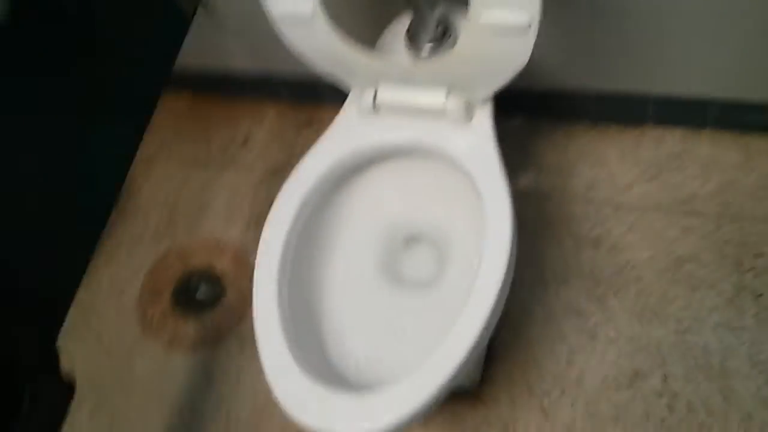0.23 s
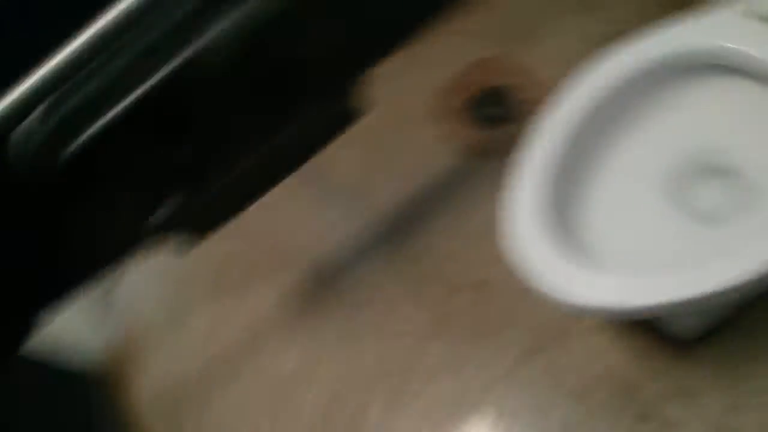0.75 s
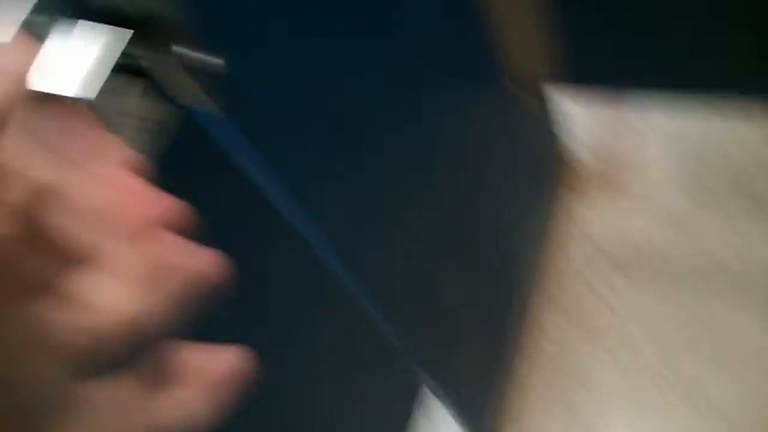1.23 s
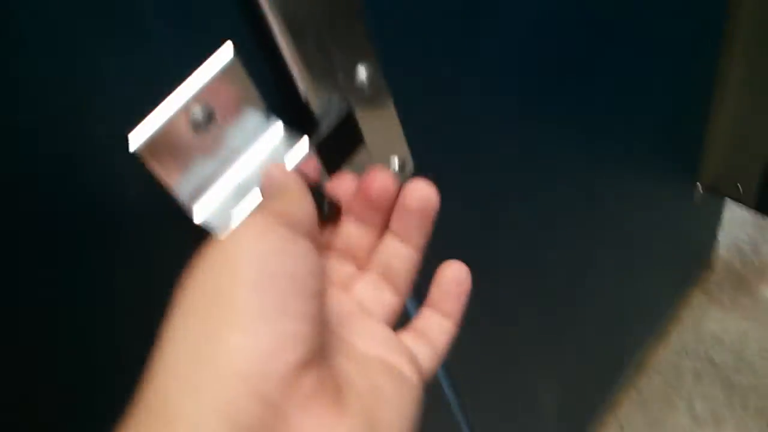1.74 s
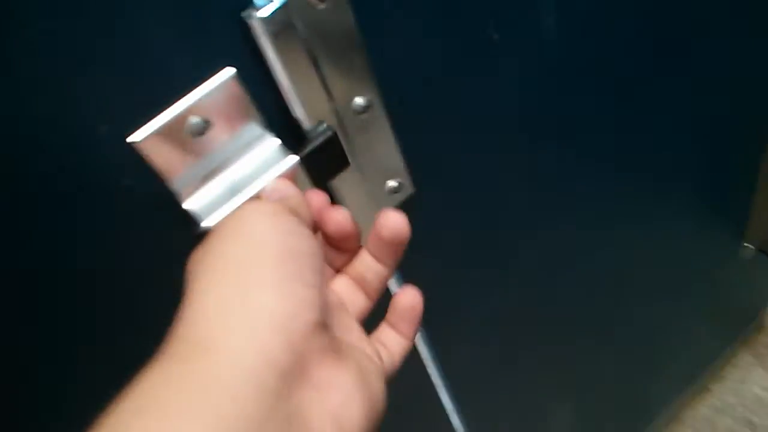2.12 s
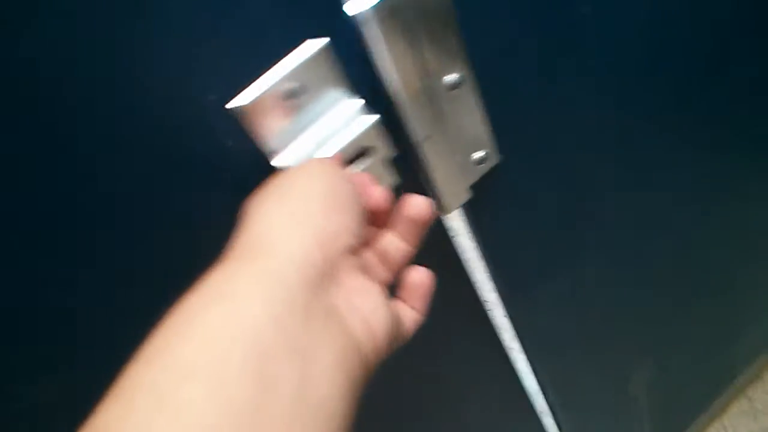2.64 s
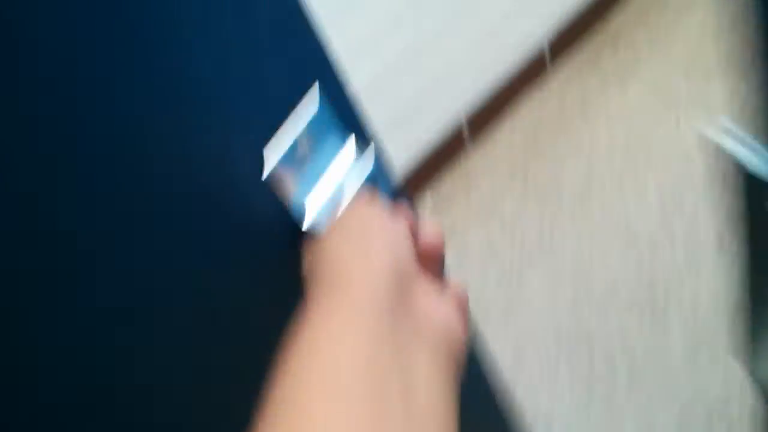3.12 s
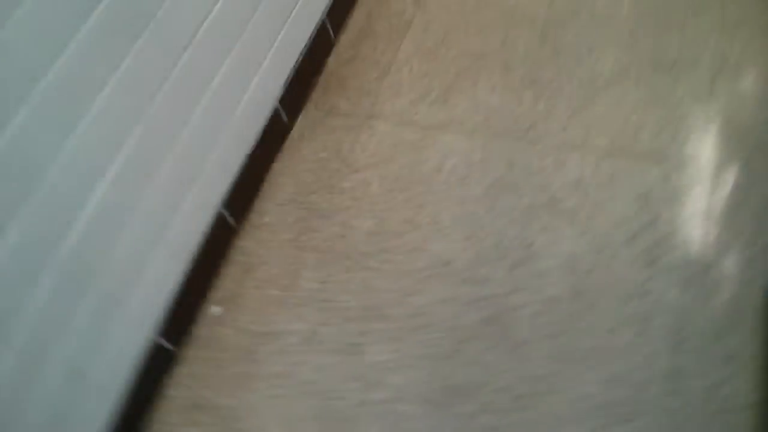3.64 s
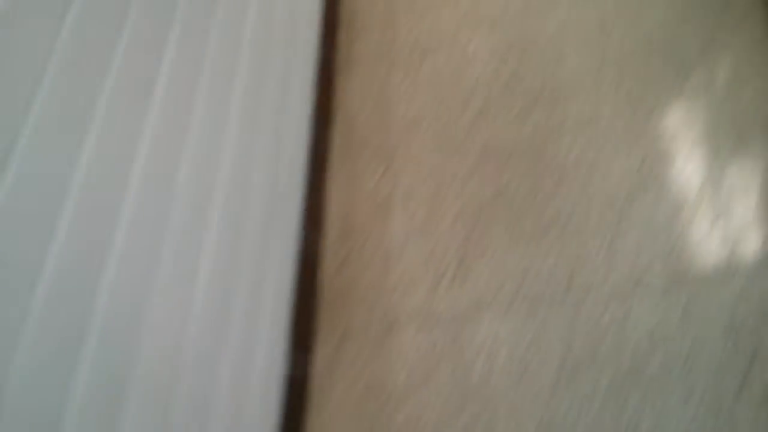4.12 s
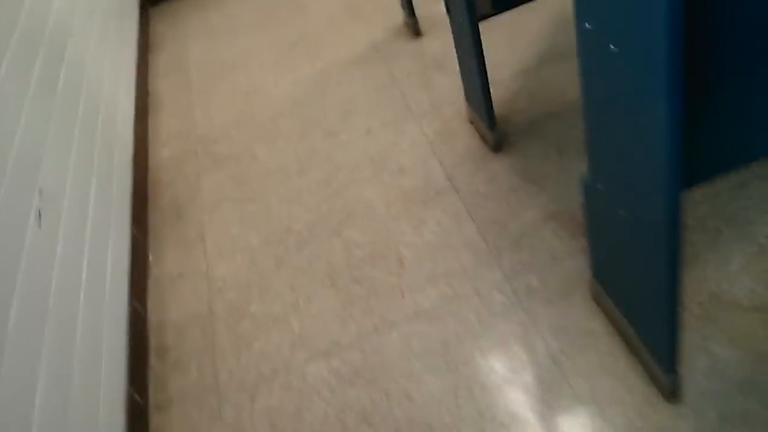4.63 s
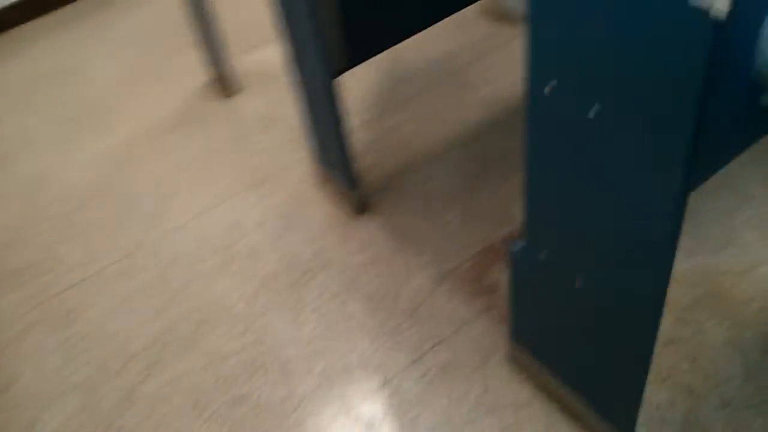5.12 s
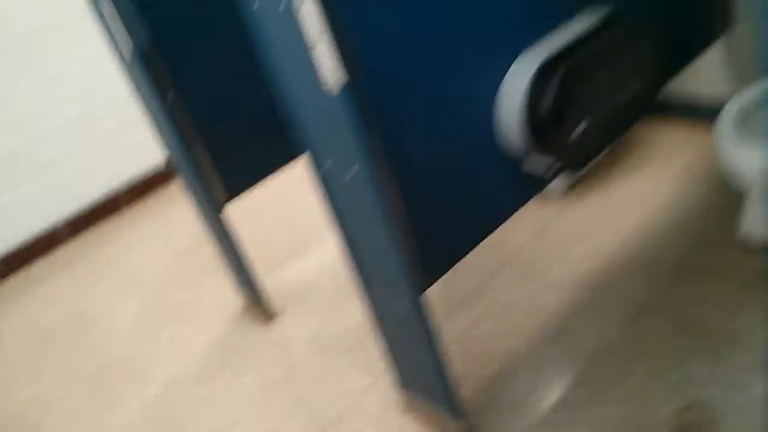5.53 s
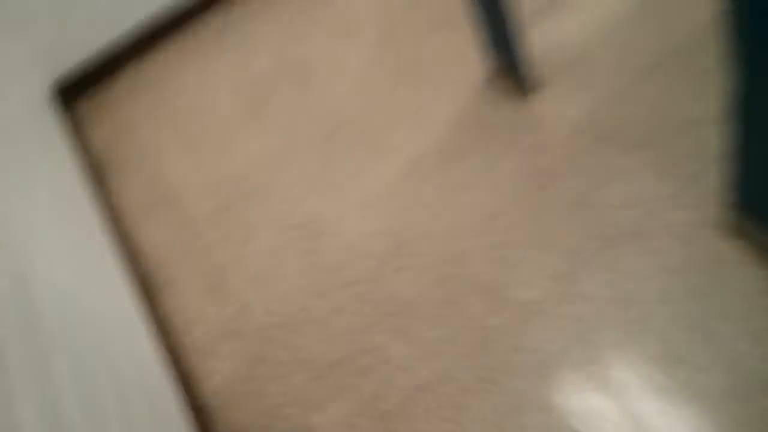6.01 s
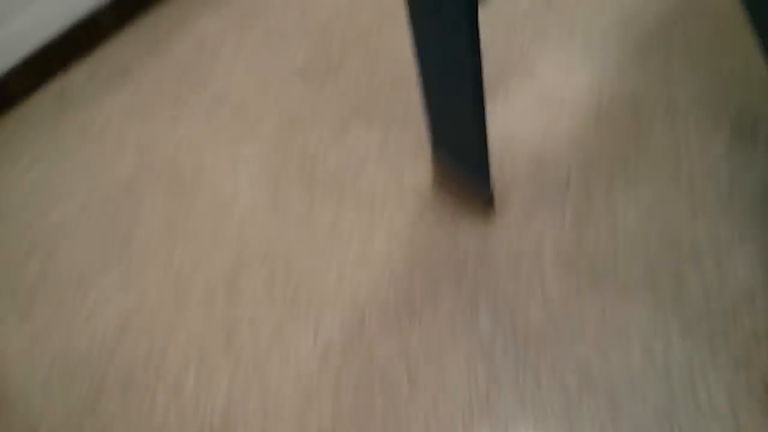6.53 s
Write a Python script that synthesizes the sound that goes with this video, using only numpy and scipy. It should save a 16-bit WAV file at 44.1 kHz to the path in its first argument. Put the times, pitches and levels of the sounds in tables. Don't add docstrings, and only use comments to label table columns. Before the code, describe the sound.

Low electrical hum swells and fades in a tiled restroom while a stall bolt slams, its latch rattles, and soft steps, taps and cloth follow.

```python
import sys
import numpy as np
from scipy import signal
from scipy.fft import rfft, irfft, next_fast_len
from scipy.io import wavfile
from scipy.ndimage import uniform_filter1d, map_coordinates

SR = 44100
rng = np.random.default_rng(int(sys.argv[2]) if len(sys.argv) > 2 else 0)


def natural_amplitude(level_db):
    exponent = np.asarray(level_db, float) / 20
    return 10 ** exponent


def wrap_up_sound(samples):
    columns = np.atleast_2d(samples).T
    tamed = np.clip(columns, -1, 1)
    steps = np.round(tamed * 32767).astype(np.int16)
    wavfile.write(sys.argv[1], SR, steps)


N = 298107

MAINS_HZ = 60


def hum():
    beat_hz, shaft_hz, shaft_db = 19, 58.8, -62.5
    # (multiple of mains [1], motor beats added [1], level [dB])
    hum_lines = [(2, -1, -72.5), (2, 0, -58.5), (2, 0.95, -62), (3, 0, -63.5), (4, -1, -63), (4, 0, -62),
                 (4, 1, -69.5), (6, -1, -64), (6, 0, -65), (6, 0.96, -70.5), (8, -1.2, -68), (8, 0, -65.5),
                 (10, -0.56, -72), (10, 0.28, -72.5)]
    total = np.zeros(N)
    for multiple, beats, db in hum_lines:
        hz = multiple * MAINS_HZ + beats * beat_hz
        total += standing(hz) * line(hz, db, flutter_db=1.82)
    t = np.arange(N) / SR
    share, fades_s, slower_hz, in_step_s = 0.65, 4.1, 2.4, 0.066
    twin = share / (1 + np.exp((t - fades_s) / 0.17))
    beating = np.abs(1 + twin * np.exp(2j * np.pi * slower_hz * (t - in_step_s)))
    return total + beating * standing(shaft_hz) * line(shaft_hz, shaft_db, flutter_db=1.0)


def line(hz, db, flutter_db):
    phase = 2 * np.pi * (hz * np.arange(N) / SR + rng.random())
    phase = phase + 0.2 * flutter_db * wobble(5)
    return np.sqrt(2) * natural_amplitude(db + flutter_db * wobble(9)) * np.sin(phase)


def standing(hz):
    # (time [s], half length [s], room resonance
    # [Hz], gain [dB])
    loud_spots = [(0.15, 0.22, 152.5, 24), (0.187, 0.21, 246, 27), (0.207, 0.12, 355.5, 17.5),
                  (0.397, 0.45, 490, 10), (0.59, 0.478, 350, 8.5), (0.764, 0.27, 243.7, 21),
                  (0.987, 0.098, 244, 15.5), (1.093, 0.46, 148, 19), (1.123, 0.18, 241, 25),
                  (1.29, 0.11, 241, 10), (1.378, 0.3, 112, 22.5), (1.496, 0.13, 234, 5.5),
                  (1.57, 1.5, 56.1, 8.5), (1.663, 0.12, 355, 5.5), (2.189, 0.61, 120.6, 25.5),
                  (2.26, 0.1, 497, 17), (2.28, 0.37, 329.5, 3.5), (3.1, 0.57, 122.8, 14.5),
                  (3.14, 0.21, 350.6, 18), (3.254, 0.38, 476.3, 8), (3.594, 0.53, 249.6, 0),
                  (4.15, 0.596, 356.6, 13.4), (4.21, 0.166, 480, 9.4), (4.22, 0.034, 160.4, 27),
                   (4.27, 0.64, 182.3, 13), (4.29, 0.069, 56.4, 11.3), (4.43, 0.34, 268.2, 26.6),
                   (4.56, 0.24, 224.7, 19.5), (4.86, 0.11, 474, 20), (4.978, 0.22, 136, 4.9),
                   (4.98, 0.2, 60.8, 13), (5.02, 0.28, 243.5, 19.2), (5.59, 0.12, 59, 13.7),
                   (5.72, 0.31, 366.2, 13.7), (5.77, 0.21, 241, 16.2), (6.07, 0.094, 137, 13),
                   (6.14, 0.183, 60, 14), (6.16, 0.092, 270, 22), (6.18, 0.11, 364, 25.3),
                   (6.2, 0.11, 470, 15), (6.38, 0.81, 168.3, 16.6), (6.49, 0.15, 364, 18),
                   (6.54, 0.2, 243.7, 16.6), (6.56, 0.19, 488, 16.4), (6.6, 0.092, 134, 6.2),
                   (6.65, 0.084, 218.7, 16)]
    # (time [s], half length [s], centre [Hz], share cancelled [0-1])
    dead_spots = [(.5, 0.4, 114, 0.9), (1.3, 0.46, 488, .7), (3.738, 0.37, 57.7, 1),
                  (4.081, .05, 183.3, 0.9), (4.479, .13, 125, 0.84), (5.4, 0.13, 238, 1),
                  (5.454, 0.14, 477, 0.85), (4.55, 0.23, 211.7, 0.36)]
    spot_width_hz = 16
    t = np.arange(0, N + 256, 256) / SR

    def near(s, half, spot_hz):
        return np.exp(-((hz - spot_hz) / spot_width_hz) ** 2 - ((t - s) / half) ** 2)

    loud = 1 + sum(natural_amplitude(db) * near(*spot) for *spot, db in loud_spots)
    dead = np.prod([1 - min(share, 1) * near(*spot) for *spot, share in dead_spots], axis=0)
    return np.interp(np.arange(N) / SR, t, loud * dead)


def slam():
    # (time [s], peak [dB], middle [dB], treble [dB], time to fall 60 dB [s])
    blows = [
        (1.826, -56, -15.5, -30.5, 0.029),
        (1.84, -37.5, -13, -29.5, 0.25),
        (1.8546, 1, -2, 16, 0.008),
        (1.8554, 0, -2, 13.5, 0.0085),
        (1.8574, -1.5, -4.5, 1.5, 0.045),
        (1.864, -3, 0, 0.5, .012),
        (1.873, -12.5, 0, -2, 0.025),
        (1.882, -15, 0, -1.5, 0.019),
    ]
    # (frequency [Hz], level [dB per Hz])
    colour = [(240, -45), (400, -23), (1010, -25), (1540, -3), (1690, -11.5), (1860, -1.5), (2460, -5.5),
              (4500, -5.5), (5330, -12.5), (7390, -4.5), (9200, -6.5), (11700, -15.5), (12500, -22),
              (14000, -24), (14900, -17), (15600, -30), (16500, -40)]
    # (frequency [Hz], width [Hz], level [dB])
    plate = [(1600, 47, 3), (1905, 33, 2), (2360, 31, 5.5), (2800, 46, 5.5), (3110, 51, 10.5),
             (3650, 63, 2.5), (4560, 110, 4.5), (6070, 88, 3), (6440, 130, 3), (7220, 38, 7.5),
             (7570, 65, 5), (8060, 61, 8.5), (8400, 30, 7.5), (8600, 55, 7.5)]
    room_db = -3.5
    return contacts([(*blow, room_db) for blow in blows], colour, plate, chatter=0.7)


def rattle():
    # (time [s], peak [dB], middle [dB], treble [dB], time to fall 60 dB [s])
    bounces = [
        (2.1972, -18.5, 13, 29.5, 0.018),
        (2.201, -23, 8.5, 9.5, 0.036),
        (2.2241, -15.5, 4.5, -3, 0.008),
        (2.2295, -21.5, 1, -2.5, .02),
        (2.2868, -10.5, 3.5, 12, 0.01),
        (2.2882, -12, 0, 6.5, .015),
        (2.295, -21, 9.5, 11, .01),
        (2.304, -17, 2.5, 1, .01),
        (2.309, -19.5, 0, -0.5, .01),
        (2.316, -19, 5, 1, .01),
    ]
    # (frequency [Hz], level [dB per Hz])
    colour = [(450, -47), (750, -24), (1000, -23.5), (1260, -3), (1700, -6.5), (1900, 1.5), (2320, 0),
              (2600, -8.5), (3100, -22), (3800, -31.5), (4400, -19), (5000, -19.5), (5600, -31.5),
              (10500, -55.5), (15000, -78.5)]
    # (frequency [Hz], width [Hz], level [dB])
    latch = [(1220, 60, -1), (1332, 68, 9), (1500.4, 40.3, 2.5), (1633, 40, 3), (1910, 34, 7.5),
             (2093, 40, 7.5), (2160, 400, 2.5), (2306, 45, 9), (2720, 32.3, 4.5), (3000, 100, 5),
             (4260, 100, 4.5), (4690, 70, 8.5), (4960, 30, 11)]
    rows = [(*bounce, -5) for bounce in bounces]
    return contacts(rows, colour, latch, chatter=0.45, click=0.6, swell_s=0.001)


def knock():
    # (time [s], peak [dB], middle [dB], treble [dB], time to fall 60 dB [s])
    bumps = [
        (4.267, -35, -2, 0.0059, 0.02),
        (4.2703, -27, 6.5, 0, 0.017),
        (4.2765, -27.5, 4.5, 0, .015),
        (4.2847, -27, -14, 0, 0.025),
        (4.2921, -30, -17, 0, .015),
        (4.364, -45, -3, 0, .01),
    ]
    # (frequency [Hz], level [dB per Hz])
    colour = [(500, -43), (950, -25.5), (1200, -9.5), (1600, -0.5), (2000, -3), (2200, -15), (3200, -9.5),
              (3900, -24.5), (4900, -20.5), (5400, -44), (7000, -57)]
    # (frequency [Hz], width [Hz], level [dB])
    door = [(1615, 62, -9), (1910, 29, -4), (2270, 70, -15), (2710, 110, -8), (3070, 49, -9),
            (3920, 29, -20), (4300, 45, -21), (4640, 81, -26)]
    rings_db, room_db = 2.5, 0.5
    panel = [(hz, width, rings_db + db / 4) for hz, width, db in door]
    return contacts([(*bump, room_db) for bump in bumps], colour, panel, chatter=0.5)


def taps():
    # (time [s], peak [dB], middle [dB], treble [dB], room [dB])
    touches = [(0.0351, -37, -14, -14, 1.5), (0.0454, -18, -32, -26.5, -17.5), (0.0556, -35, -11, -6, -0.5),
               (0.182, -32, -28, -3, -9.5), (0.6205, -35, -22, -15, 1), (0.843, -46.5, -36, -42, -6),
               (0.8932, -45, -33, -18, -13), (0.909, -41, -31, -25, -4), (0.9894, -47.5, -37, -23, -18),
               (4.7444, -50.5, -28, -30, -1.5), (4.857, -53, -27, -28, -8), (4.8889, -23, -23, -26, -8.5),
               (5.082, -46, -28, -26, -10), (5.542, -49, -9.5, -20.5, 6.5), (5.9877, -52, -9, -26, 8.5),
               (6.0461, -19, -17.5, -18, -8.5), (6.0685, -42, -8, 3, -13.5), (6.114, -42, -25, -25, -6),
               (6.5555, -47, -37, -16, 4.5), (6.7554, -19.5, -1.5, -8, -10)]
    # (frequency [Hz], level [dB per Hz])
    colour = [(300, -12), (700, -19.5), (1000, -7), (1400, 0.5), (2200, -6.5), (2600, -28.5), (3050, -10),
              (3600, -5), (4500, 0.5), (5600, 3.5), (6600, 6), (9500, -6.5), (16000, -21.5)]
    t60_s, delay_s = 0.0098, 0.001
    rows = [(*touch, t60_s, room_db) for *touch, room_db in touches]
    return contacts(rows, colour, [], chatter=0.15, lag=delay_s)


def contacts(rows, colour, modes, chatter, lag=0, click=1, swell_s=1e-5):
    out, t = np.zeros(N + SR), np.arange(4096) / SR
    last = -1

    def ring(f):
        return 1 + sum(natural_amplitude(g) * 1j * f * w / (c * c - f * f + 1j * f * w) for c, w, g in modes)

    def shaded(f):
        return 0.43 + 0.55 * ring(f)

    for s, db, mid_db, high_db, t60, room_db in rows:
        rise = 1 - np.exp(-t / max(swell_s, 1e-5))
        grit = chatter * rng.standard_normal(len(t)) * natural_amplitude(-60 * t / max(t60, 0.002)) * rise
        crack = grit + click * (t == 0)
        tilt = [(2500, 0), (3300, mid_db), (5300, mid_db), (6000, high_db)]
        push = causal(lambda f: along(colour, f) + along(tilt, f), len(t))
        hit = filtered(signal.fftconvolve(crack, push), ring)
        hit = hit * natural_amplitude(db) / np.abs(hit).max()
        shade = filtered(push, shaded)
        shade = shade * np.linalg.norm(hit) / np.linalg.norm(shade)
        if s - last > 0.02:
            room, last = tail(), s
        wet = natural_amplitude(room_db) * signal.fftconvolve(shade, room)
        start = round((s + lag) * SR)
        out[start:start + len(hit)] += hit
        out[start:start + len(wet)] += wet
    return out[:N]


def tail():
    # (frequency [Hz], time to fall 60 dB [s])
    tiles = [(500, 0.23), (1300, 0.35), (2200, 0.22), (3200, 0.23), (5000, .3), (9000, 0.18), (11500, 0.18),
             (13000, 0.15)]
    patchy_db = 3
    late_db, late_longer = -23.5, 2.7
    hz, t, z = signal.stft(rng.standard_normal(SR // 2), SR, nperseg=256)
    fall_db = -60 * t / along(tiles, hz)[:, None]
    clumps = uniform_filter1d(rng.standard_normal(z.shape), size=9, axis=0)
    clumps = uniform_filter1d(clumps, size=3, axis=1)
    fall = natural_amplitude(fall_db) + natural_amplitude(late_db + fall_db / late_longer)
    x = signal.istft(z * natural_amplitude(patchy_db * unit(clumps)) * fall, SR, nperseg=256)[1]
    return np.pad(x / np.linalg.norm(x), (120, 0))


def thuds():
    # (time [s], peak [dB], pitch [Hz], time to fall 60 dB [s], dull puff [dB])
    steps = [(.298, -44, 564.3, 0.066, 4), (4.06, -47, 550, 0.059, -2), (4.108, -42, 557, 0.046, 3),
             (1.856, -32.5, 595, 0.063, -8), (3.399, -38, 72, 0.16, -23), (4.208, -36, 596, 0.086, -1),
             (4.36, -32, 349, 0.07, -5), (4.887, -27.5, 191.7, 0.055, 0.5), (6.05, -25, 114, 0.07, -13),
             (6.129, -27, 200, 0.1, -17), (6.56, -28.5, 456, 0.084, -8), (6.752, -28, 153, 0.22, -3)]
    out, t = np.zeros(N + SR), np.arange(SR // 3) / SR
    for s, db, hz, t60, puff_db in steps:
        noise = rng.standard_normal(len(t))
        puff = unit(filtered(noise, lambda f: f / (f + 80) / (1 + (f / 620) ** 8)))
        shape = natural_amplitude(-60 * t / t60) * (1 - np.exp(-t / 0.0042))
        push = np.sin(2 * np.pi * hz * t) + natural_amplitude(puff_db) * puff
        out[round(s * SR):][:len(t)] += natural_amplitude(db) * shape * push
    return out[:N]


def rubs():
    # (time [s], length [s], centre [Hz], width [Hz],
    # level [dB])
    strokes = [(0.189, 0.088, 2070, 252, -64), (0.367, 0.088, 2110, 252, -68.5),
               (.06, 0.23, 1600, 1300, -64), (0.401, 0.17, 1350, 420, -60), (0.611, 0.098, 1300, 354, -58),
               (0.886, 0.041, 1610, 960, -53.5), (4.742, 0.079, 510, 223, -50.5),
               (4.879, 0.017, 1600, 1200, -50), (4.95, 0.24, 610, 450.3, -58.5),
               (6.044, .01, 1500, 1200, -52), (4.901, 0.2, 1670, 1402, -66),
               (5.02, 0.058, 1490, 352, -62.5), (6.07, 0.2, 1580, 1460, -61),
               (6.477, 0.21, 1502, 1202, -65.5), (6.638, 0.083, 1396, 393, -58),
               (0.052, 0.0079, 6260, 699, -44), (0.382, 0.25, 7550, 4702, -63),
               (0.613, 0.031, 7300, 1102, -66), (1.8395, .002, 8400, 1800, -54),
               (1.847, 0.0046, 8900, 2200, -49), (1.678, 0.027, 9000, 6000, -64),
               (2.057, .006, 10300, 1510, -60), (2.1975, 0.0027, 8500, 1210, -32),
               (6.046, 0.0072, 6500, 1500, -46), (4.79, .055, 4750, 350, -64),
               (0.755, 0.041, 7000, 3000, -66), (4.894, 0.022, 7240, 5050, -50),
               (4.895, 0.18, 4180, 1502, -67.5), (5.526, 0.15, 4050, 1614, -65),
               (5.97, 0.083, 9840, 2460, -63.5), (6.063, 0.2, 6160, 6030, -61.5),
               (6.65, 0.076, 4330, 902, -69.5)]
    # (time [s], length [s], level [dB])
    swishes = [(1.225, 0.13, -68), (2.43, 0.082, -67.5), (2.935, 0.053, -70), (3.925, .1, -67),
               (4.631, .09, -67), (6.554, 0.11, -66.5)]
    swish_hz, swish_width_hz = 11200, 9300
    sleeves = [(s, length, swish_hz, swish_width_hz, db) for s, length, db in swishes]
    out = np.zeros(N + SR)
    for s, length, hz, width, db in strokes + sleeves:
        u = np.arange(SR // 4) / SR / length
        rough = uniform_filter1d(rng.standard_normal(len(u)), size=150) * np.sqrt(150)
        grit = rng.standard_normal(len(u)) * natural_amplitude(1.47 * rough)
        band = unit(filtered(grit, lambda f: 1 / (1 + ((f - hz) / (width / 2)) ** 4)))
        out[round(s * SR):][:len(u)] += natural_amplitude(db) * band * np.clip(5 * u, 0, 1) * np.exp(-u ** 2.4)
    return out[:N]


def cloth():
    # (time [s], cloth level [dB])
    moving = [(0, -63.5), (.3, -67), (1.24, -71), (2.8, -73.5), (4.1, -72), (4.75, -71.5), (5.1, -70),
              (5.95, -72), (6.3, -72), (6.76, -66.5)]
    # (frequency [Hz], level [dB per Hz])
    rustle_colour = [(500, -20.5), (900, 2.5), (1350, 1.5), (1750, -2.5), (2100, -2.5), (2600, -11),
                     (3100, -22.5), (4000, -42.5)]
    # (frequency [Hz], level [dB per Hz])
    scuff_colour = [(2600, -23.5), (3200, -7), (3800, -2), (4700, 1), (5500, -3), (6500, -23.5)]
    moving_db = curve(moving)
    usual_db = moving_db.mean()
    scuff_db = usual_db - 9.5 + 0.8 * (moving_db - usual_db)
    scuff_db = scuff_db + 0.83 * np.arange(N) / SR
    rustle = natural_amplitude(moving_db + 0.1) * rush(rustle_colour, patchy_db=2.5)
    return rustle + natural_amplitude(scuff_db) * rush(scuff_colour, patchy_db=1.0)


def water():
    # (frequency [Hz], level [dB per Hz])
    rumble_colour = [(60, -29), (120, -2.5), (200, -2), (300, -3.5), (500, -7), (650, -20.5), (850, -26.5),
                     (1500, -42)]
    # (frequency [Hz], level [dB per Hz])
    drone_colour = [(12, -13), (25, 1), (40, -6.5), (80, -4), (200, -6.5), (450, -17.5), (900, -31.5),
                    (1200, -47)]
    follows = 0.54
    swell = (standing(6 * MAINS_HZ) * standing(8 * MAINS_HZ)) ** (follows / 2)
    rumble = swell * natural_amplitude(-56.5 + 1.7 * wobble(6.4)) * rush(rumble_colour, patchy_db=3.0)
    drone = natural_amplitude(-56.5 + 1.7 * wobble(5.5)) * rush(drone_colour, patchy_db=1.5)
    return rumble + drone


def air():
    # (time [s], level [dB])
    vent = [(0, -68), (1.15, -70), (1.8, -68.5), (2.96, -72), (3.9, -69), (4.86, -68), (5.29, -71.5),
            (5.9, -73.5), (6.12, -69), (6.45, -71.5), (6.76, -66.5)]
    # (frequency [Hz], level [dB per Hz])
    hiss_colour = [(4000, -20), (5500, -6), (7000, -5), (9300, 1), (10800, -6.5), (12000, -18.5),
                   (14000, -39)]
    # (frequency [Hz], level [dB per Hz])
    thin_colour = [(9500, -27), (11500, -1.5), (12500, 1.5), (14000, -1), (15500, -4), (16300, -17)]
    vent_db = curve(vent)
    thin_db = vent_db - 12 + 1.22 * np.arange(N) / SR
    hiss = natural_amplitude(vent_db + 1.05) * rush(hiss_colour, patchy_db=2.5)
    return hiss + natural_amplitude(thin_db) * rush(thin_colour, patchy_db=-0.3)


def rush(spectrum, patchy_db):
    z = signal.stft(rng.standard_normal(N + 512), nperseg=512)[2]
    field = uniform_filter1d(rng.standard_normal(z.shape), size=8, axis=0)
    field = uniform_filter1d(field, size=8, axis=1)
    patches = natural_amplitude(patchy_db * np.clip(unit(field), -2, 2))
    x = signal.istft(z * patches, nperseg=512)[1][:N]
    points = [(4.5, -120)] + spectrum + [(SR / 2, -120)]
    return unit(filtered(x, lambda hz: natural_amplitude(along(points, hz))))


def unit(x):
    return x / np.sqrt(np.mean(x ** 2) + 1e-20)


def along(points, hz):
    f, v = np.transpose(points)
    return np.interp(np.log(hz + 1), np.log(f + 1), v)


def curve(points):
    s, v = np.transpose(points)
    return np.interp(np.arange(N) / SR, s, v)


def wobble(rate):
    t = np.arange(0, N + 128, 128) / SR
    knots = rng.standard_normal(int(N * rate / SR) + 4)
    return np.interp(np.arange(N) / SR, t, map_coordinates(knots, [t * rate]))


def filtered(x, response):
    m = next_fast_len(len(x) + 8192)
    return irfft(rfft(x, m) * response(np.fft.rfftfreq(m, 1 / SR)), m)[:len(x)]


def causal(db_of, length):
    m = 2 * length
    gain = natural_amplitude(db_of(np.fft.rfftfreq(m, 1 / SR)))
    cep = irfft(np.log(np.maximum(gain, 1e-6)), m)
    cep[1:length] *= 2
    cep[length + 1:] = 0
    return irfft(np.exp(rfft(cep)), m)[:length]


def scene():
    metal = slam() + rattle() + knock()
    person = taps() + thuds() + rubs() + cloth()
    return (hum() + metal + person + water() + air())[None]


def roll_off(x):
    return signal.sosfilt(signal.butter(12, 16860, fs=SR, output="sos"), x)


def record(dry):
    peak_limit, top_hz = 0.73, 16100
    soft = dry / (1 + np.abs(dry / peak_limit) ** 4) ** (1 / 4)
    kept = filtered(soft[0], lambda hz: 1 / (1 + (hz / top_hz) ** 100))[None]
    return roll_off(kept)


dry = scene()
out = record(dry)
wrap_up_sound(out)
```